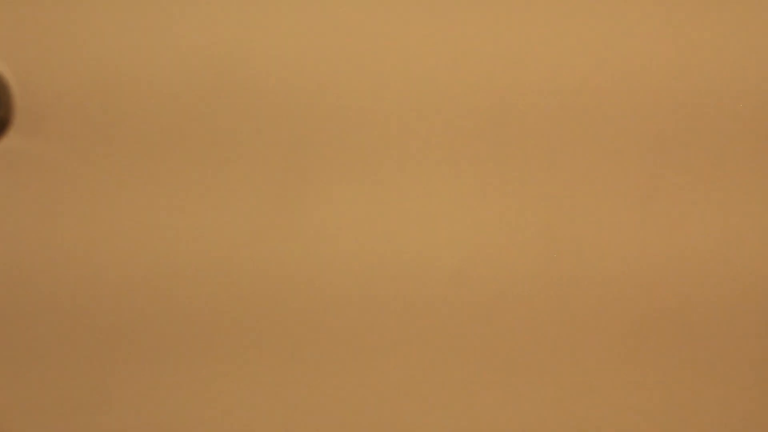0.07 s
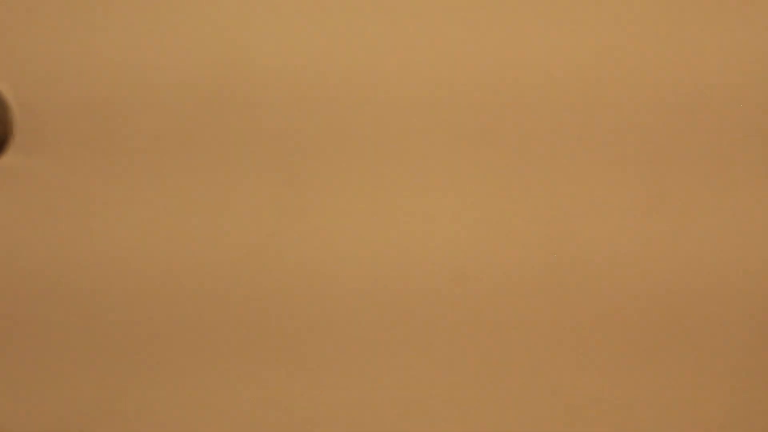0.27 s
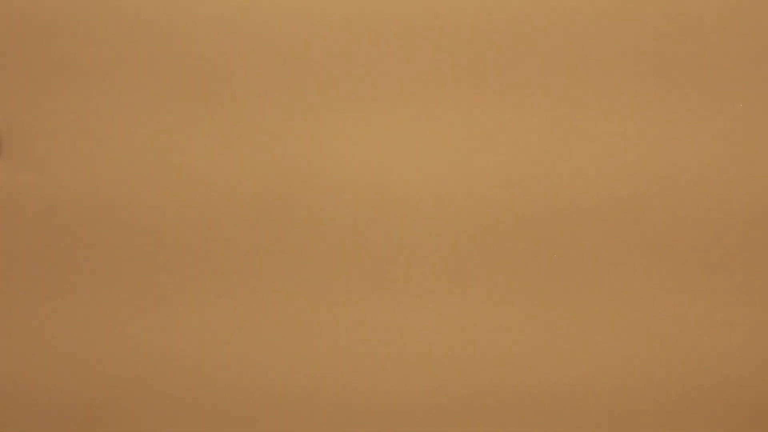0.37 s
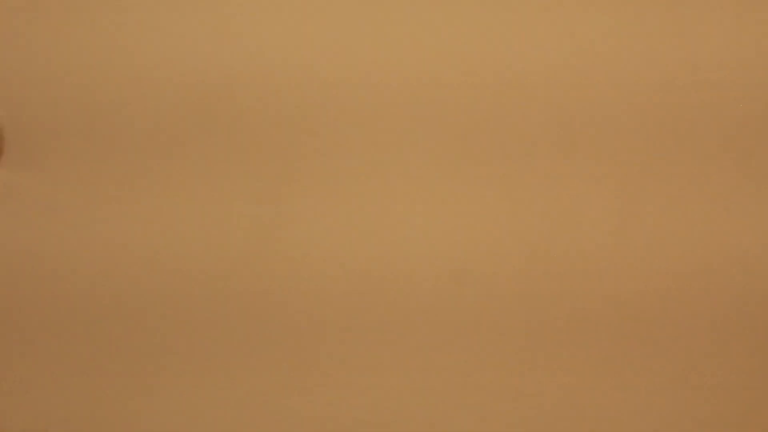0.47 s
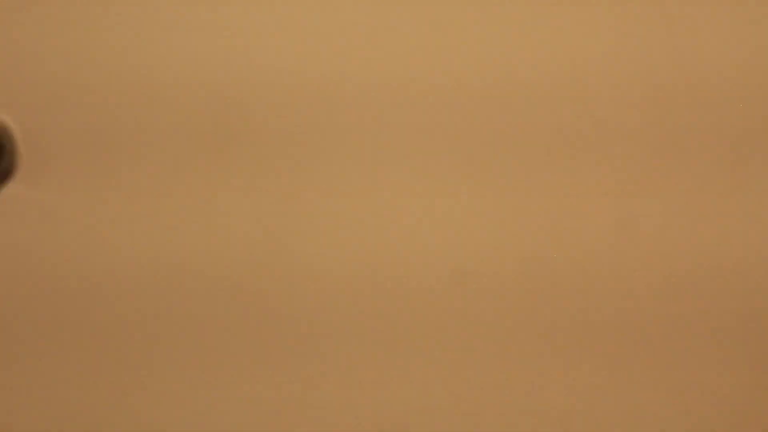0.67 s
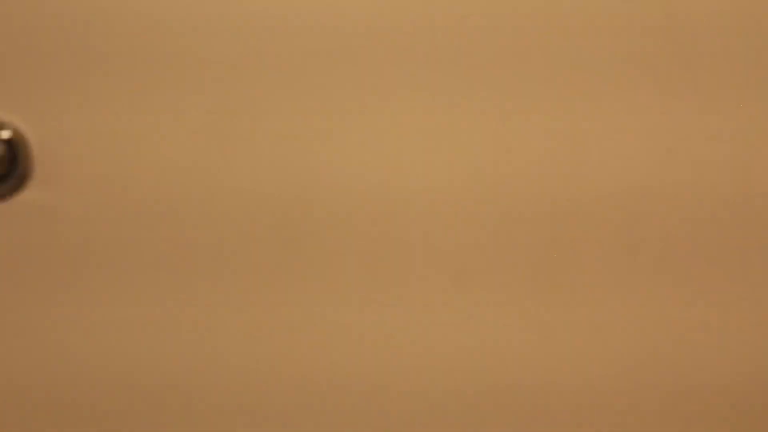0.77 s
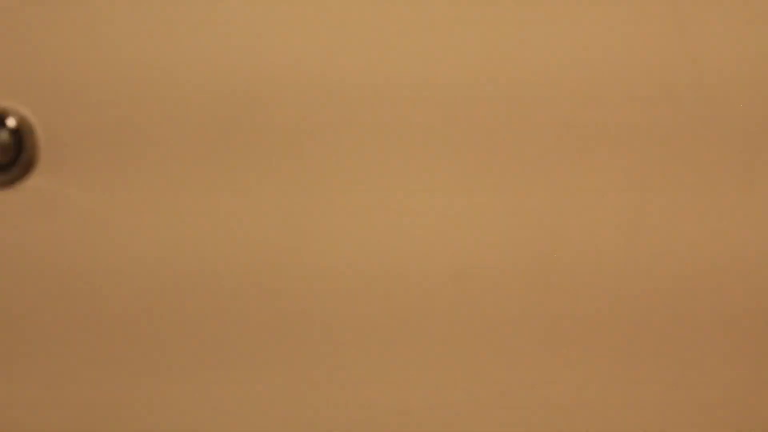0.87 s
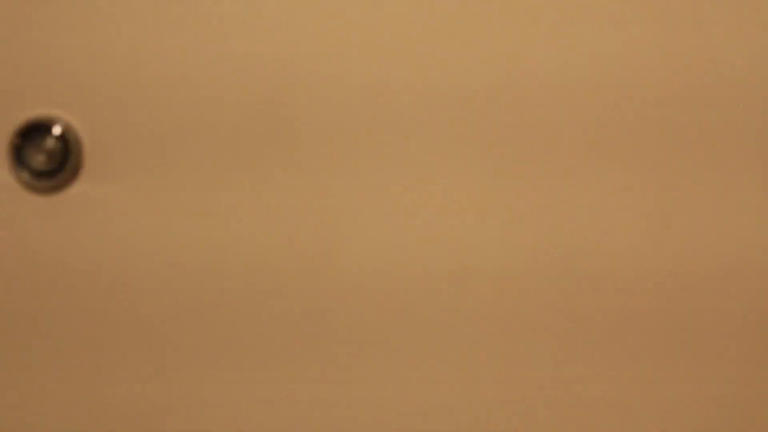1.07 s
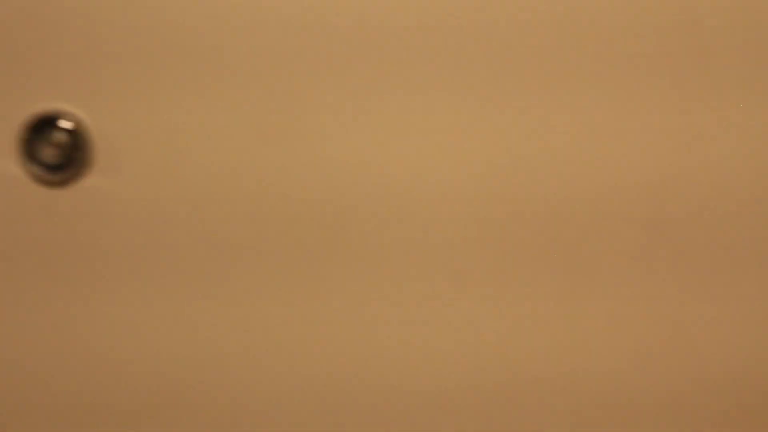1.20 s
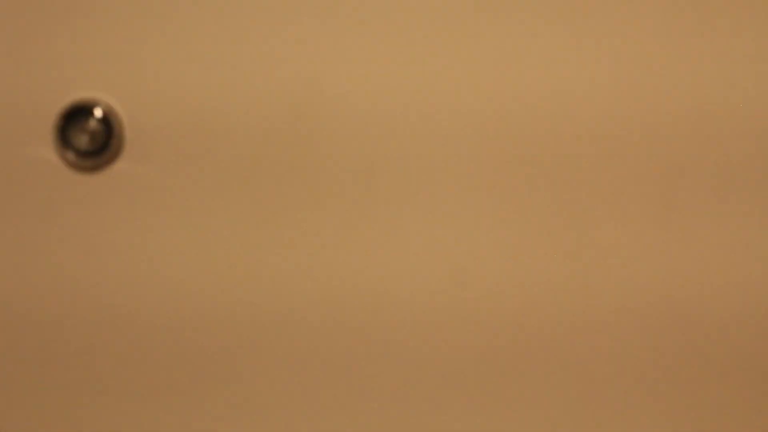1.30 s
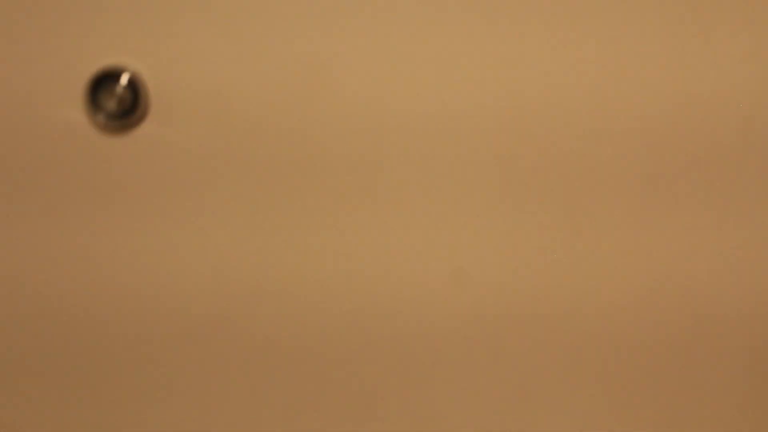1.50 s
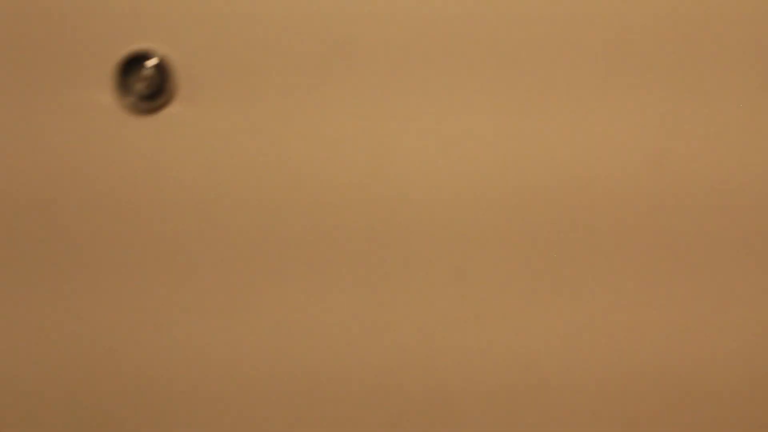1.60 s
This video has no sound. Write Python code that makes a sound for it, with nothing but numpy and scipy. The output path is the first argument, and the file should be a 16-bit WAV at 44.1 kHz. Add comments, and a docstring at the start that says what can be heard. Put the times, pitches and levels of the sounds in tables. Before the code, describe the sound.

Knuckles knock six times on a wooden front door, quick and even, each blow with a low boom and a short hallway echo. The microphone is close by, inside a quiet apartment.

```python
"""Knuckles on a front door

Six quick knocks on a wooden door, heard from close by inside a quiet flat. Each blow rings the door's
modes over a long low boom; the latch ticks as the leaf springs back, and the hall answers.
Faint high metallic pings and one dry click sit in the room's hush.
The loudest peaks overload the microphone."""
import sys
import numpy as np
from scipy import signal
from scipy.fft import rfft, irfft, next_fast_len
from scipy.io import wavfile
from scipy.ndimage import uniform_filter1d

SR = 44100
rng = np.random.default_rng(int(sys.argv[2]) if len(sys.argv) > 2 else 0)


def dump(signal):
    """Clip the signal to [-1, 1] and save it as 16-bit WAV at the path in sys.argv[1]."""
    limited = np.clip(np.atleast_2d(signal).T, -1, 1)
    pcm = np.round(limited * 32767).astype(np.int16)
    wavfile.write(sys.argv[1], SR, pcm)


N = 72765
TIME = np.arange(N) / SR


def undb(db):
    """Decibels to linear gain."""
    return 10 ** (np.asarray(db) / 20)


def equalise(x, curve):
    """Minimum-phase EQ along a (Hz, dB) curve, so that nothing sounds before a blow."""
    hz, db = np.array(curve, float).T
    size = next_fast_len(2 * N)
    bin_hz = np.maximum(np.arange(size // 2 + 1) * SR / size, 1)
    gain = undb(np.interp(np.log(bin_hz), np.log(np.sort(hz)), db))
    cepstrum = irfft(np.log(gain), size)
    cepstrum[1:size // 2] *= 2  # fold onto positive time to make the filter causal
    cepstrum[size // 2 + 1:] = 0
    return irfft(rfft(x, size) * np.exp(rfft(cepstrum)), size)[:N]


def noise(spectrum):
    """Noise of rms 1, coloured by a (Hz, dB) curve."""
    x = equalise(rng.standard_normal(N), spectrum)
    return x / x.std()


def envelope(t60_s, rise_s):
    """Quick attack, then an exponential decay of 60 dB in t60_s."""
    return (1 - np.exp(-TIME / rise_s)) * np.exp(-np.log(1000) * TIME / t60_s)


def delay(x, seconds):
    """The same sound, starting later."""
    return np.concatenate([np.zeros(round(seconds * SR)), x])[:N]


def hush():
    """Low room tone and a thin hiss, both slowly sinking."""
    # Spectra of room tone and hiss. Each row: frequency in Hz, relative level in dB.
    room_spectrum = [(18, -77), (30, -14), (59, -7.5), (247, -3.5), (322, -19), (350, -11.5), (1220, -21),
                     (4000, -24), (5200, -37), (8800, -120)]
    hiss_spectrum = [(1000, -11), (2500, 6.5), (6000, 4.5), (11000, 6.5), (14000, -3), (15500, -31.5)]
    treble_cut = [(1500, 1.5), (3000, -4.5), (12000, -22)]
    room = equalise(undb(-49.5) * noise(room_spectrum), treble_cut)
    hiss = undb(-61.5) * noise(hiss_spectrum)
    sink_db_per_s = 3
    return (room + hiss) * undb(-sink_db_per_s * TIME)


def buzzing_modes(modes_hz):
    """Sines at slightly uneven levels, each roughened by a fast random flutter."""
    flutter_hz = 420
    out = np.zeros(N)
    for hz in modes_hz:
        flutter = uniform_filter1d(rng.standard_normal(N), int(SR / flutter_hz))
        amplitude = (0.54 + 0.59 * flutter / flutter.std()) * undb(2 * rng.standard_normal())
        out += amplitude * np.sin(2 * np.pi * hz * TIME)
    return out / np.sqrt(len(modes_hz))


def metal_pings():
    """Tiny metallic pings, each with one leading mode over a softer shared cluster."""
    # The pings. Each row: start in seconds, leading mode in Hz, level in dB.
    pings = [(0.1, 6250, -50.5), (0.289, 7600, -52.5), (.386, 13620, -52), (.390, 12500, -37),
             (0.536, 7520, -46.5), (0.631, 12800, -45.5), (0.837, 13620, -40.5), (0.853, 13300, -39.5),
             (0.931, 6280, -46.5), (.936, 8600, -47), (1.01, 7380, -44), (1.055, 12720, -44),
             (1.268, 6250, -58), (1.288, 13620, -38), (1.361, 12500, -41.5), (1.431, 7790, -57),
             (1.478, 6290, -48), (1.573, 6160, -56)]
    # The modes that ring in every ping. Each entry: frequency in Hz.
    cluster_hz = [6250, 7520, 8450, 11500, 12500, 13620]
    out = np.zeros(N)
    for start, lead_hz, db in pings:
        ring = buzzing_modes([lead_hz]) + undb(-6) * buzzing_modes(cluster_hz)
        out += delay(undb(db) * ring * envelope(t60_s=0.079, rise_s=0.00083), start)
    return out


def knuckle_tap():
    """Bone meets the door's skin in a short burst of noise."""
    # Spectrum of the tap. Each row: frequency in Hz, relative level in dB.
    spectrum = [(1200, -3), (2300, -8.5), (3000, -6.5), (3800, -29.5), (6000, -34), (12000, -32)]
    return undb(-25.5) * noise(spectrum) * envelope(t60_s=0.029, rise_s=0.0012)


def door_leaf():
    """The struck leaf rings, its neighbouring modes swinging in opposite senses."""
    # The door's modes. Each row: frequency in Hz, level in dB, time to fall 60 dB in seconds.
    modes = [(94, -11.5, 0.041), (110.43, -29.5, 1), (187.9, -48, 0.9), (221.7, -18, 0.15),
             (307.5, -37.5, 0.31), (393.4, -7, 0.047), (447.6, -42.5, 0.39), (491.7, -26, 0.22),
             (574, -28, 0.17), (692, -12.5, 0.14), (773, -26.5, 0.27), (824.5, -6.5, 0.05),
             (993, -3.5, 0.038), (1011.3, -5, 0.067), (1195.4, -12.5, .07), (1331, -11, 0.053),
             (1456, -12, 0.025), (1546, -19, 0.073), (1942, -15, 0.011), (2205, -22, 0.027)]
    ring = np.zeros(N)
    for k, (hz, db, t60_s) in enumerate(modes):
        decay = np.exp(-np.log(1000) * TIME / t60_s)
        ring += (-1) ** k * undb(db) * np.sin(2 * np.pi * hz * TIME) * decay
    knuckle_hz = 2400  # the soft contact excites little above this
    return signal.sosfilt(signal.butter(6, knuckle_hz, fs=SR, output="sos"), ring)


def hall_reverb():
    """The hall answers a blow with a dark tail that swells and dies away."""
    # Spectrum of the tail. Each row: frequency in Hz, relative level in dB.
    spectrum = [(60, 1), (170, 9), (260, -3), (410, 6.5), (560, -0.5), (800, -4.5), (1400, -4), (1900, -15),
                (2800, -63.5), (8000, -42.5)]
    return undb(-29.5) * noise(spectrum) * envelope(t60_s=0.7, rise_s=0.027)


def frame_ring():
    """The frame and near walls add a short, dense ring."""
    # Spectrum of the ring. Each row: frequency in Hz, relative level in dB.
    spectrum = [(40, -6.5), (135, 2.5), (200, -1), (255, 9.5), (400, -2), (700, 15), (1000, 0.5), (1400, 8),
                (2100, -16.5), (2800, -34.5), (4500, -43.5), (14000, -42.5)]
    return undb(-12) * noise(spectrum) * envelope(t60_s=0.091, rise_s=0.00067)


def latch_tick():
    """The latch ticks as the leaf springs back."""
    # Spectrum of the tick. Each row: frequency in Hz, relative level in dB.
    spectrum = [(900, 7.5), (2100, 8), (3000, -10), (4000, -9), (6000, -22.5), (9000, -39.5)]
    return undb(-33.5) * noise(spectrum) * envelope(t60_s=0.035, rise_s=0.00073)


def knocking():
    """Six blows: where the hand lands colours the lows and mids, its hardness sets the treble."""
    # The blows. Each row: start in seconds, strength in dB, then low, mid and treble EQ in dB.
    knocks = [(0.2298, -0.5, 0, 1.5, -4), (0.4585, 0, -0.5, 1, 1.5), (0.6816, 0.1, -11, 3, 3.5),
              (.9015, 0.38, -8.5, 2, 2.5), (1.1195, 1.97, -4, -9, -1), (1.3337, 3.5, -4, -10.5, -2.5)]
    # Corners of each blow's EQ. Each entry: frequency in Hz.
    corners_hz = [120, 215, 370, 520, 720, 1100, 1900]
    resonance = door_leaf() + delay(frame_ring(), seconds=0.0065) + hall_reverb()
    out = np.zeros(N)
    for start, db, low_db, mid_db, treble_db in knocks:
        colour = list(zip(corners_hz, [0, low_db, mid_db, mid_db, 0, 0, treble_db]))
        blow = equalise(knuckle_tap() + resonance, colour)
        latch = delay(latch_tick(), seconds=0.046)
        out += undb(db) * delay(blow + latch, start)
    return out


def dry_click():
    """One small, bright click close to the microphone."""
    # The click's cue. Each row: start in seconds, level in dB.
    clicks = [(0.5749, -32.5)]
    spectrum = [(1200, -12), (3000, 3.5), (6000, -6), (10000, 4), (15000, -16)]
    snap = envelope(t60_s=0.0083, rise_s=0.00032)
    return sum(delay(undb(db) * noise(spectrum) * snap, start) for start, db in clicks)


def scene():
    """The knocks up front, with pings, click and hush beneath, in mono."""
    return (knocking() + metal_pings() + dry_click() + hush())[None]


def record(dry):
    """The microphone clips the highest peaks and cuts the top."""
    top_hz = 15400
    lowpass = signal.ellip(8, 0.2, 70, top_hz, fs=SR, output="sos")
    return signal.sosfilt(lowpass, np.clip(dry, -1, 1))


dry = scene()
out = record(dry)
dump(out)
```